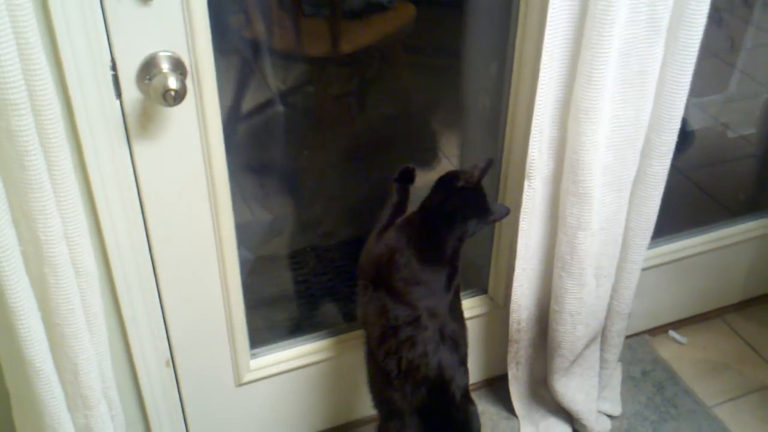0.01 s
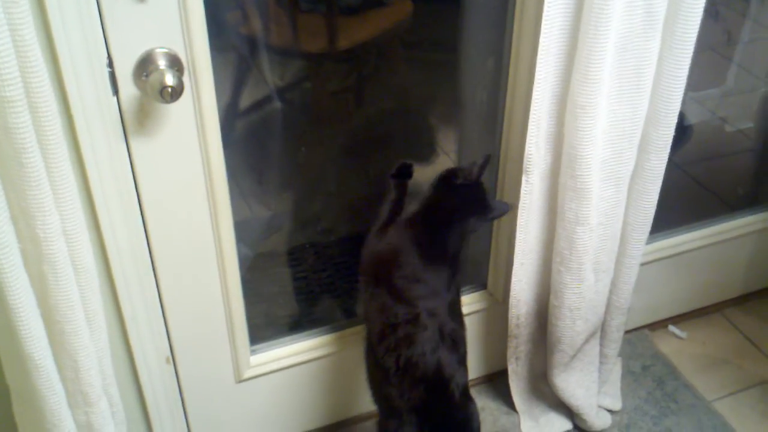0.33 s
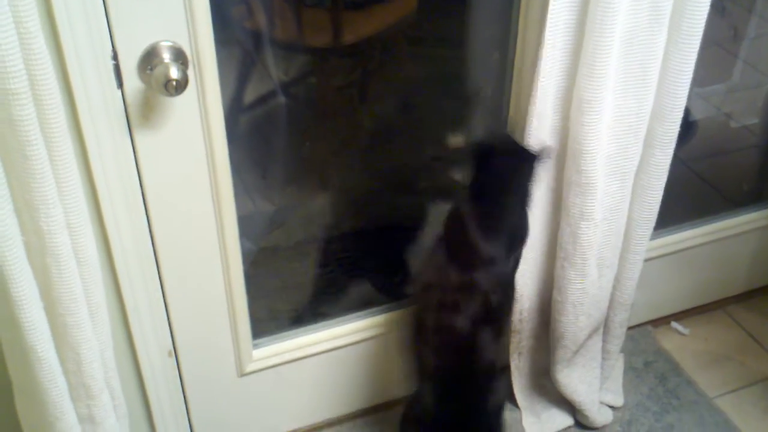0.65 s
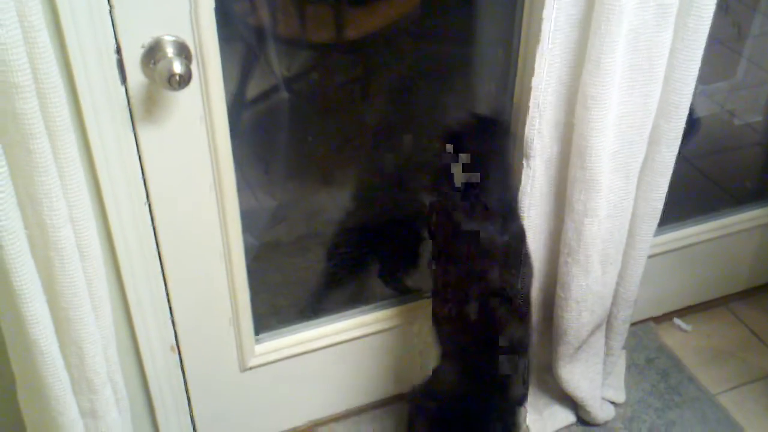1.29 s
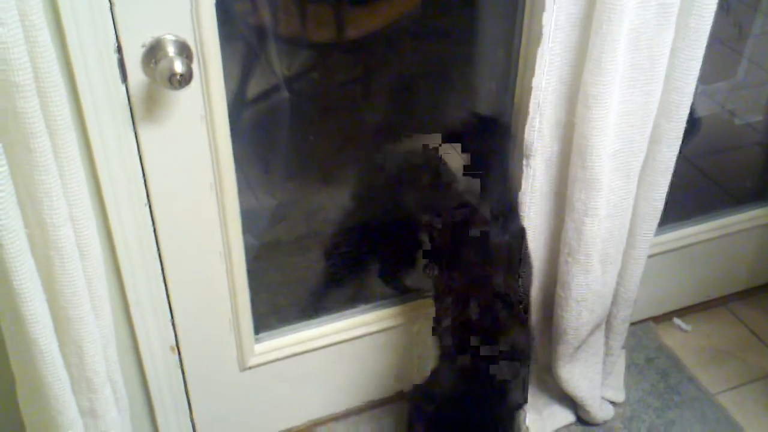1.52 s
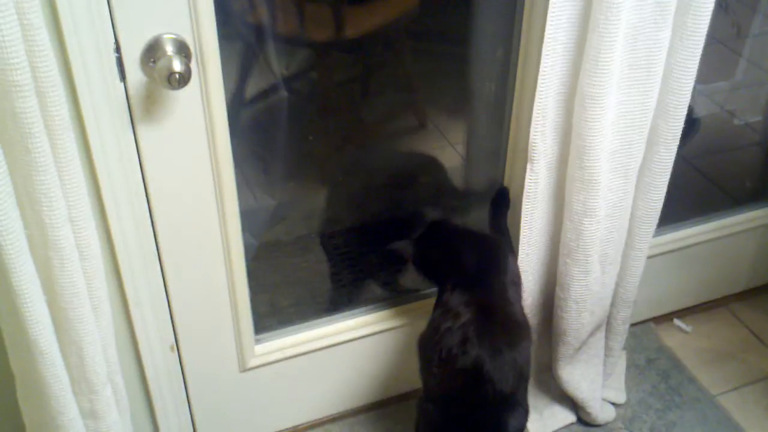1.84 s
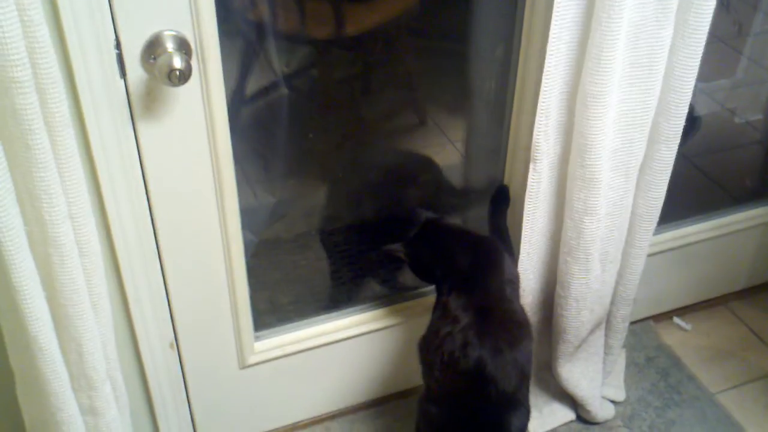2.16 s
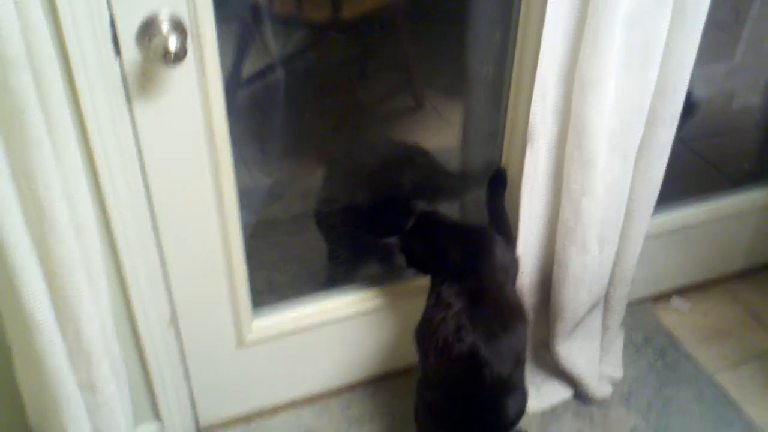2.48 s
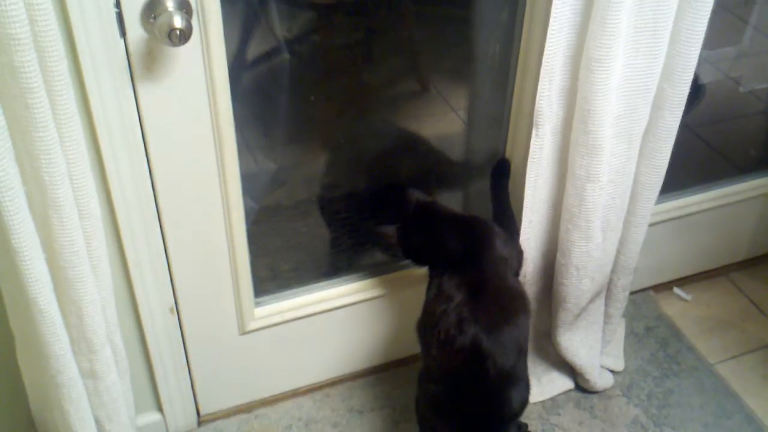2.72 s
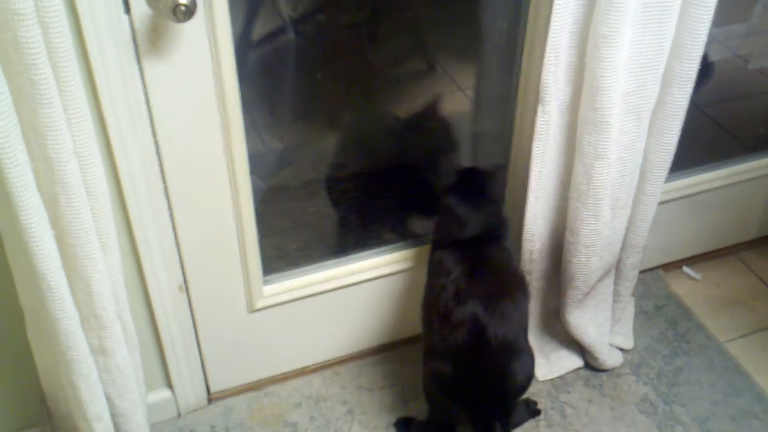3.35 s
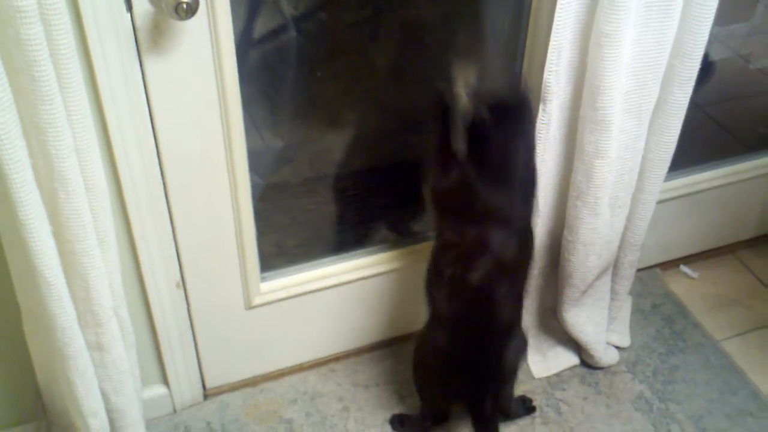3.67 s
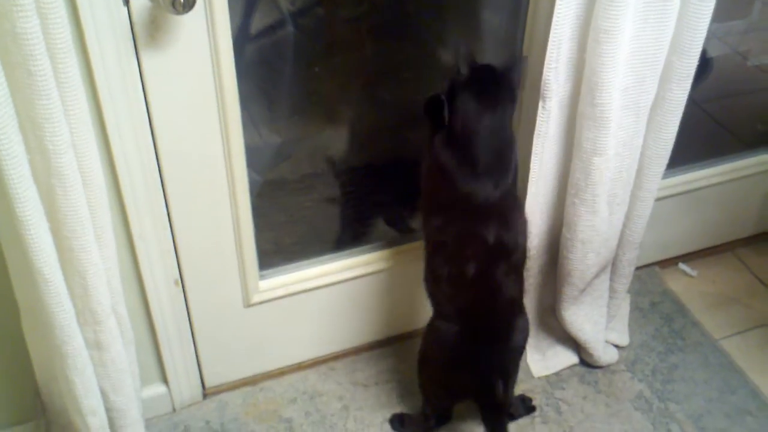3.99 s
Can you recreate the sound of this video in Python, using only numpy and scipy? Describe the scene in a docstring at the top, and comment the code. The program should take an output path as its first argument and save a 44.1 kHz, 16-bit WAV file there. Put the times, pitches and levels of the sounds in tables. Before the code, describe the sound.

One sharp knock sounds as a cat bumps a glass door, clacking it in its latch and echoing briefly in the room. Later come a small claw tick and faint fur swishes, over steady motor hum and microphone hiss.

```python
"""A cat knocks a glass door once: it chatters in its latch for 20 ms, pane and frame ring, the room answers.
Soft thuds of the cat's weight surround the knock; later come a small claw tick and brushes of fur.
Underneath, a motor, probably a refrigerator, hums over a bed of moving air.
The camera widens its stereo picture by cross-feeding its two microphones, and adds its own hiss."""
import sys
import numpy as np
from scipy import signal
from scipy.fft import rfft, irfft
from scipy.io import wavfile

SR = 44100
rng = np.random.default_rng(int(sys.argv[2]) if len(sys.argv) > 2 else 0)


def wav_record(signal):
    """Record a signal, one row per channel, as 16-bit PCM in the file named by sys.argv[1]."""
    frames = np.transpose(np.atleast_2d(signal))
    bounded = np.clip(frames, -1, 1)
    # unit amplitude maps onto the largest positive 16-bit level
    quanta = np.round(bounded * 32767).astype(np.int16)
    wavfile.write(sys.argv[1], SR, quanta)


N = 176400
TIME = np.arange(N) / SR
BIN_HZ = np.arange(N // 2 + 1) * SR / N


def undb(db):
    """Decibels to gain."""
    return 10 ** (np.asarray(db) / 20)


def along(hz, points):
    """Read a curve of (frequency [Hz], value) points on a log-frequency axis."""
    point_hz, values = np.array(points, float).T
    return np.interp(np.log(np.maximum(hz, 1)), np.log(point_hz), values)


def noise(db):
    """Noise with the given density [dB per Hz] in each spectral bin."""
    return irfft(rfft(rng.standard_normal(N)) * undb(db), N) * np.sqrt(SR / 2)


def coloured(points):
    """Noise shaped by a curve of (frequency [Hz], density [dB per Hz]) points."""
    return noise(along(BIN_HZ, points))


def stereo(mid, side):
    """Left and right from mid and side."""
    return np.array([mid + side, mid - side])


def wide_noise(db, side_db):
    """Stereo noise of mid density db, with an independent side signal side_db relative to it."""
    return stereo(noise(db), undb(side_db) * noise(db))


def fade(t60):
    """Exponential decay that falls 60 dB in t60 seconds."""
    return np.exp(-np.log(1000) * TIME / t60)


def delayed(sound, seconds):
    """The stereo sound, started later."""
    return np.pad(sound, ((0, 0), (int(seconds * SR), 0)))[:, :N]


def wander(rate_hz):
    """Smooth random modulation with a spread of 1."""
    drift = noise(-10 * np.log10(1 + (BIN_HZ / rate_hz) ** 4))
    return drift / drift.std()


def treble(hz, corner_hz=5500):
    """High-shelf shape, rising from 0 in the bass to 1 in the treble."""
    return 1 - 1 / (1 + (hz / corner_hz) ** 4)


def hum(motor_hz=58.41, mains_hz=60, waver=0.072, waver_hz=15):
    """Motor and mains harmonics waver slightly; standing waves place each between the microphones."""
    # hum lines (harmonic number, level [dB], left minus right [dB], left phase lead [rad])
    motor_lines = [(2, -71.5, -3, -0.44), (5, -48.5, -6.5, -0.16), (6, -60.5, 3.5, -0.27),
                   (7, -67, -3.5, -0.75), (8, -64, -1, 0.15), (9, -73.5, 4, -1.4), (10, -79.5, -2.5, 1),
                   (11, -68, 5, -0.3), (13, -84, -11, 0.92), (15, -81.5, 5, -0.66), (17, -85.5, -17, 0.38),
                   (19, -85.5, 13.5, -0.51)]
    mains_lines = [(4, -67, 1.7, 0.0093), (10, -82.5, 0.6, 0.64)]
    sides = np.array([[.5], [-.5]])
    out = 0
    for base_hz, lines in (motor_hz, motor_lines), (mains_hz, mains_lines):
        for harmonic, db, pan_db, lead in lines:
            phase = 2 * np.pi * (harmonic * base_hz * TIME + rng.random()) + waver * wander(waver_hz)
            amplitude = np.sqrt(2) * undb(db + sides * pan_db) * (1 + waver * wander(waver_hz))
            out = out + amplitude * np.sin(phase + sides * lead)
    return out


def air(drone_hz=241.1, half_width_hz=4.3, drone_db=-70.5):
    """Steady rush of moving air with one narrow, droning resonance."""
    # air common to both microphones, and differing between them (frequency [Hz], density [dB per Hz])
    mid_colour = [(25, -108), (60, -107.5), (110, -83.5), (170, -79.5), (280, -82.5), (450, -85.5),
                  (700, -97), (1100, -103), (1700, -108), (2150, -109), (2600, -117), (3100, -111),
                  (4000, -117), (6000, -128), (14000, -130)]
    side_colour = [(25, -103), (50, -99), (95, -82), (180, -86.5), (300, -87), (480, -92), (700, -101),
                   (1100, -107), (2000, -110), (3000, -111), (4500, -124), (14000, -130)]
    drone = noise(drone_db - 20 * np.log10(1 + ((BIN_HZ - drone_hz) / half_width_hz) ** 2))
    return stereo(coloured(mid_colour) + drone, coloured(side_colour))


def thuds(cutoff_hz=75):
    """Dull pushes in the deep bass as the cat shifts its weight."""
    # weight shifts (time [s], bass density before the envelope [dB per Hz])
    shifts = [(.29, -92), (.572, -76), (.635, -74)]
    lowpass_db = -10 * np.log10(1 + (BIN_HZ / cutoff_hz) ** 6)
    swell = fade(t60=.13) * (1 - fade(t60=.03))
    return sum(delayed(wide_noise(db + lowpass_db, side_db=-8) * swell, start) for start, db in shifts)


def door_ring():
    """The struck pane and frame ring on in damped tones."""
    # modes of pane and frame (frequency [Hz], relative level [dB], t60 [s])
    modes = [(715, -50, 0.14), (781, -54, 0.78), (884, -59, .6), (1147, -53, .3), (1178, -47, .33),
             (1248, -49, 0.33), (1394, -56, .38), (1546, -52.5, 0.42), (1630, -62, .5), (1816, -59, 0.31),
             (2075, -56, 0.49), (2126, -50, .22), (3194, -51, .1), (6385, -63, 0.11), (7693, -45, 0.11)]
    return sum(undb(db) * np.sin(2 * np.pi * (hz * TIME + rng.random())) * fade(t60)
               for hz, db, t60 in modes)


def room_tail(colour, build_s=0.0061):
    """Diffuse reverb that builds up quickly and dies sooner in the treble."""
    # decay of the room (frequency [Hz], t60 [s])
    decay_times = [(200, 0.87), (1200, 0.44), (4000, 0.43), (8000, 0.34), (13000, 0.28)]
    octaves_hz = 125 * 2. ** np.arange(8)
    spectrum = rfft(wide_noise(along(BIN_HZ, colour), side_db=0))
    tail = 0
    for hz in octaves_hz:
        band = along(BIN_HZ, list(zip(octaves_hz, octaves_hz == hz)))
        tail = tail + irfft(spectrum * band, N) * fade(along(hz, decay_times))
    return tail * (1 - np.exp(-TIME / build_s))


def knock():
    """Each latch contact clacks and cracks at the touched part's pitch; door and room ring on."""
    # contacts of the door in its latch: wood is low, metal bright
    # (time [s], clack gain [dB], clack treble [dB], crack pitch [Hz], crack level [dB], crack t60 [s])
    contacts = [(.5664, 2, -8, 3960, -39.5, 0.0055), (.5692, -3, -1, 814, -34.5, 0.015),
                (0.5707, -6, 8.5, 9130, -46, 0.01), (.5785, -9, -1, 6760, -42, 0.0065),
                (.5803, -5, 6.5, 9000, -47, 0.015), (.5858, -2.5, -6, 1100, -36, 0.003)]
    # colour of one clack, and of the room's answer (frequency [Hz], relative density [dB])
    clack_colour = [(60, -84), (300, -75), (550, -82), (780, -69.5), (1020, -96), (1220, -73),
                    (1700, -77.5), (2600, -85), (4100, -88.5), (5000, -80), (6100, -87.5), (8000, -79),
                    (9700, -80.5), (11200, -94), (12600, -88.5), (14000, -101)]
    room_colour = [(100, -100), (450, -82.5), (750, -87.5), (1300, -83), (2200, -88.5), (4000, -94.5),
                   (8000, -94.5), (10000, -99), (13500, -113)]
    ring_out = undb(-3.5) * door_ring() + undb(4.5) * room_tail(room_colour)
    out = delayed(ring_out, contacts[0][0])
    for start, clack_db, treble_db, crack_hz, crack_db, crack_t60 in contacts:
        density_db = along(BIN_HZ, clack_colour) + clack_db + treble_db * treble(BIN_HZ)
        clack = wide_noise(density_db, side_db=-2) * fade(t60=0.025)
        crack = undb(crack_db) * np.sin(2 * np.pi * crack_hz * TIME) * fade(crack_t60)
        out = out + delayed(clack + crack, start)
    return out


def claw(side_db=-4):
    """A light double tick: each touch scratches and rings briefly, with a little room behind it."""
    # touches of the claw (time [s], gain [dB], ring treble [dB])
    touches = [(2.1943, -2, -7), (2.1995, -2, -8)]
    # colour of the scratch (frequency [Hz], relative density [dB])
    scratch_colour = [(500, -114), (1200, -94), (1700, -95), (2300, -77.5), (2950, -85), (3600, -104),
                      (6000, -116), (9000, -112), (13000, -124)]
    # ring of a tick (frequency [Hz], relative level [dB], t60 [s])
    modes = [(1584, -59, 0.055), (2120, -48, 0.023), (2860, -48, 0.02), (4580, -57.5, 0.011),
             (7200, -56.5, .013), (9200, -62, 0.011)]
    out = delayed(undb(-24) * room_tail(scratch_colour), touches[0][0])
    for start, db, treble_db in touches:
        ring = sum(undb(mode_db + treble_db * treble(hz)) * np.sin(2 * np.pi * hz * TIME) * fade(t60)
                   for hz, mode_db, t60 in modes)
        ring_to_left = stereo(ring, undb(side_db) * ring)
        scratch = wide_noise(along(BIN_HZ, scratch_colour), side_db) * fade(t60=0.031)
        out = out + undb(db) * delayed(ring_to_left + scratch, start)
    return out


def fur(grain_db=2.5, grain_hz=50):
    """Fur brushes the door in faint, grainy swishes about an octave wide."""
    # brush strokes (peak time [s], time spread [s], centre [Hz], peak density [dB per Hz])
    strokes = [(2.415, 0.02, 8200, -111), (3.29, 0.094, 2600, -112), (3.255, 0.057, 7500, -118)]
    out = 0
    for peak_s, spread_s, centre_hz, db in strokes:
        density_db = db - 24 * np.log2(np.maximum(BIN_HZ, 1) / centre_hz) ** 2
        swell = np.exp(-.5 * ((TIME - peak_s) / spread_s) ** 2)
        out = out + wide_noise(density_db, side_db=-1) * swell
    return out * undb(grain_db * wander(grain_hz))


def scene():
    """The cat at the door, in the humming room."""
    return knock() + thuds() + claw() + fur() + hum() + air()


def record(dry, cross_feed=0.75, lag_samples=17, top_hz=13950):
    """Each channel subtracts a delayed copy of the other for width; hiss is added and the top is cut."""
    # microphone hiss (frequency [Hz], density [dB per Hz])
    hiss_colour = [(100, -126), (2700, -127), (4000, -119), (5400, -118), (7200, -112.5), (10000, -111),
                   (14000, -110.5)]
    opposite = np.pad(dry[::-1], ((0, 0), (lag_samples, 0)))[:, :N]
    widened = dry - cross_feed * opposite
    hiss = np.array([coloured(hiss_colour), coloured(hiss_colour)])
    high_cut = signal.ellip(12, .2, 70, top_hz, fs=SR, output="sos")
    return signal.sosfilt(high_cut, widened + hiss)


dry = scene()
out = record(dry)
wav_record(out)
```